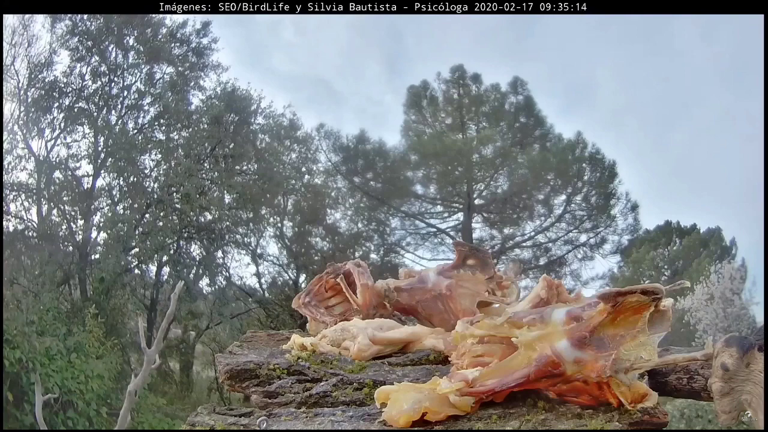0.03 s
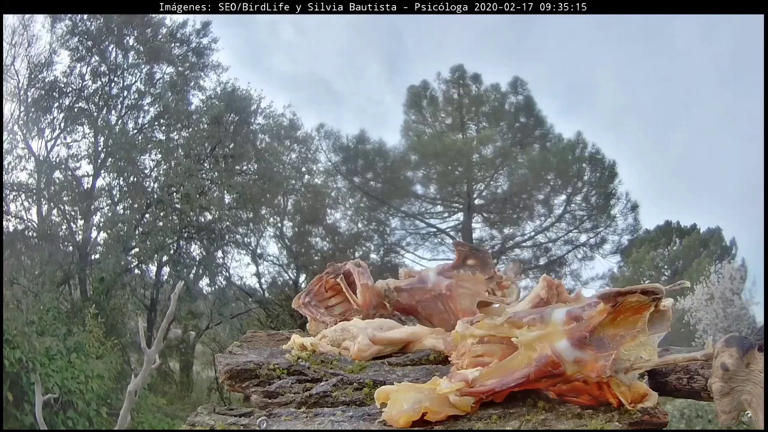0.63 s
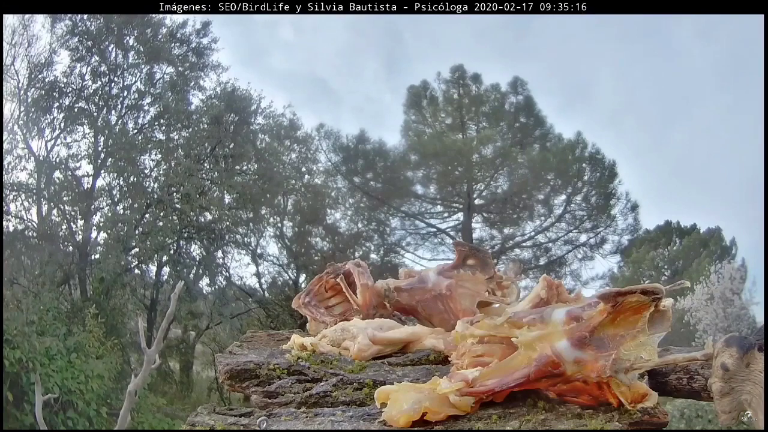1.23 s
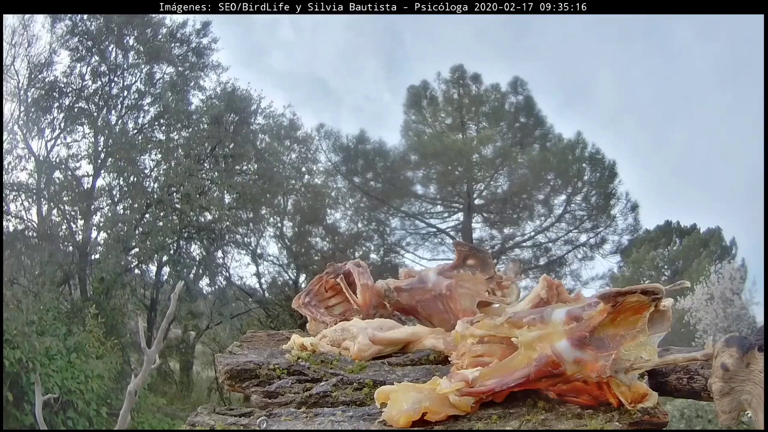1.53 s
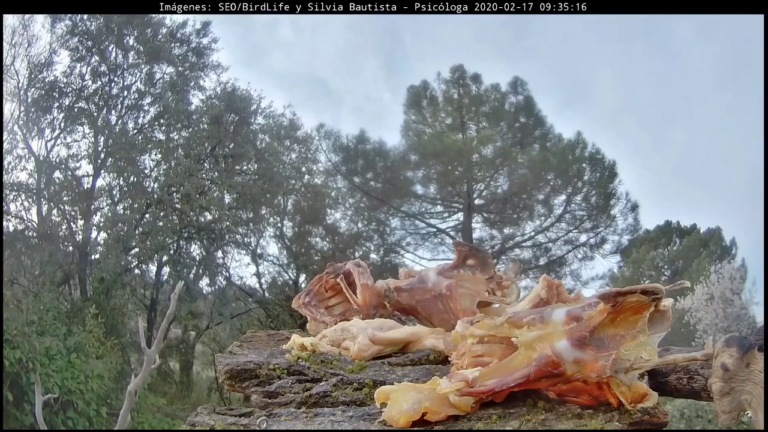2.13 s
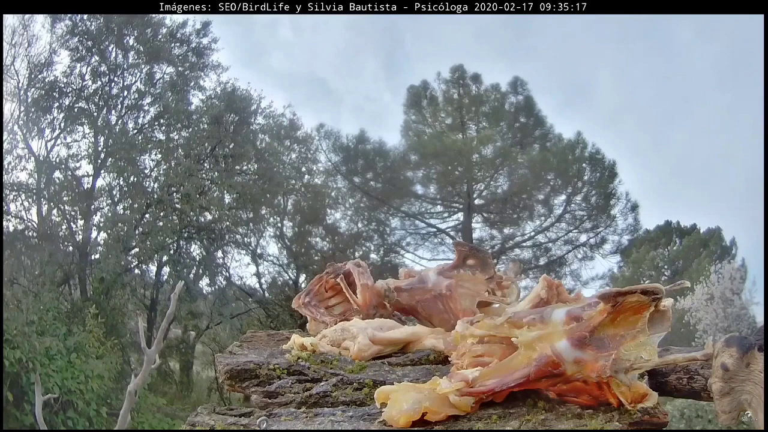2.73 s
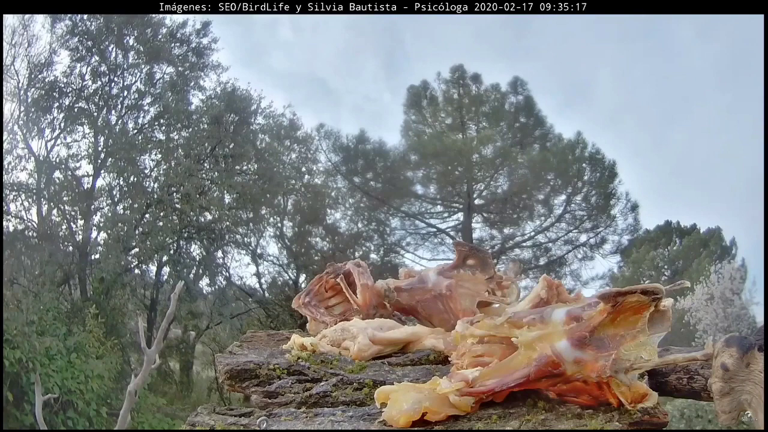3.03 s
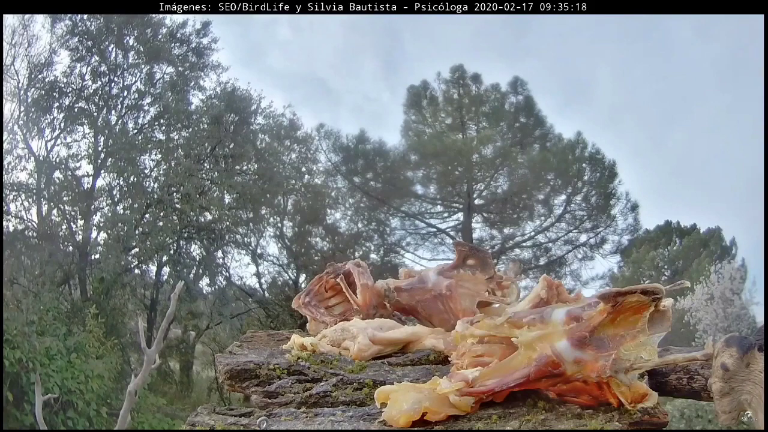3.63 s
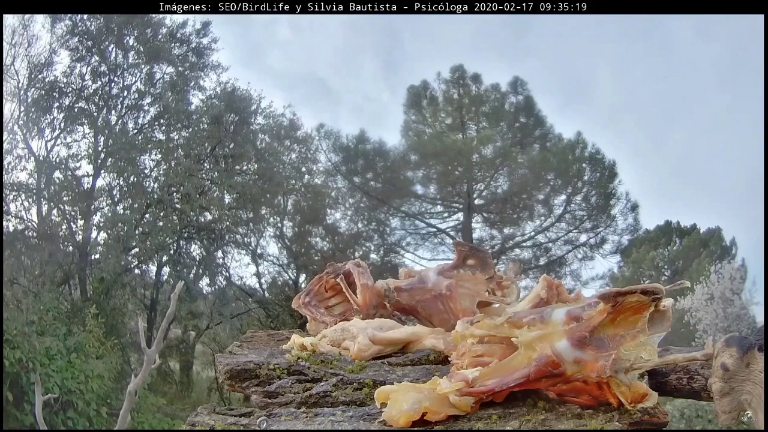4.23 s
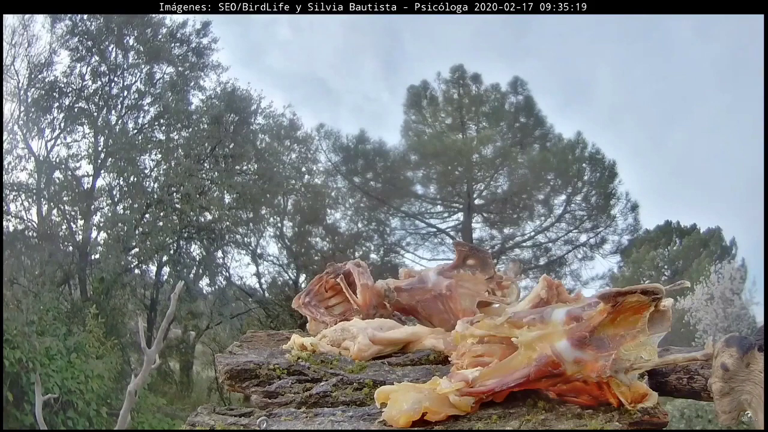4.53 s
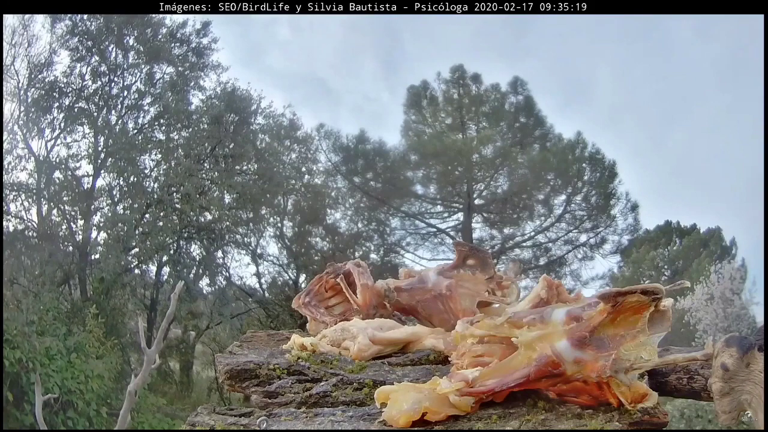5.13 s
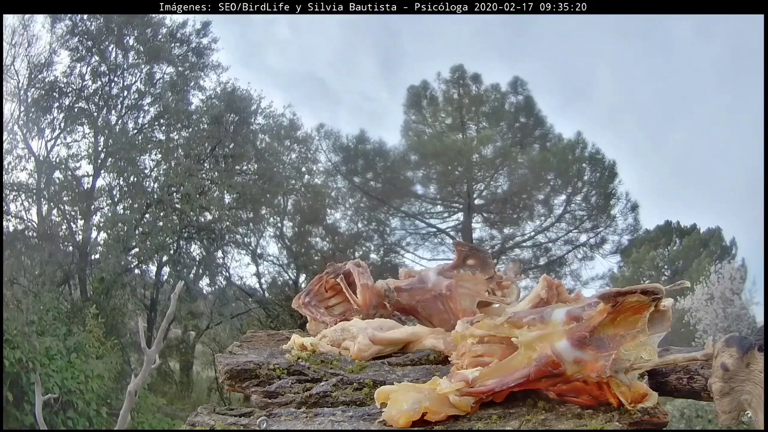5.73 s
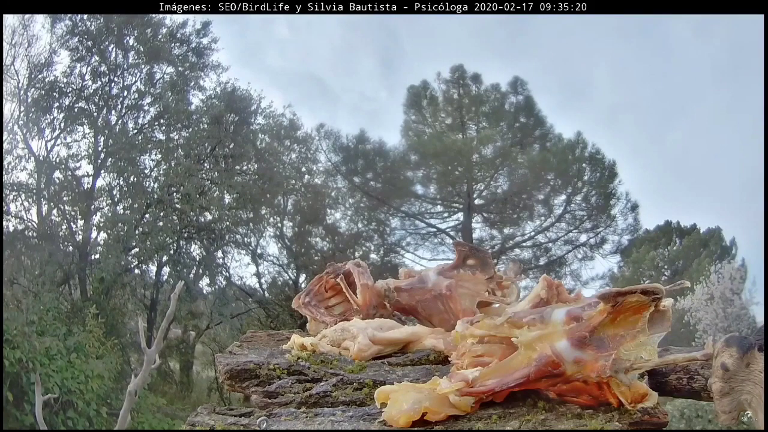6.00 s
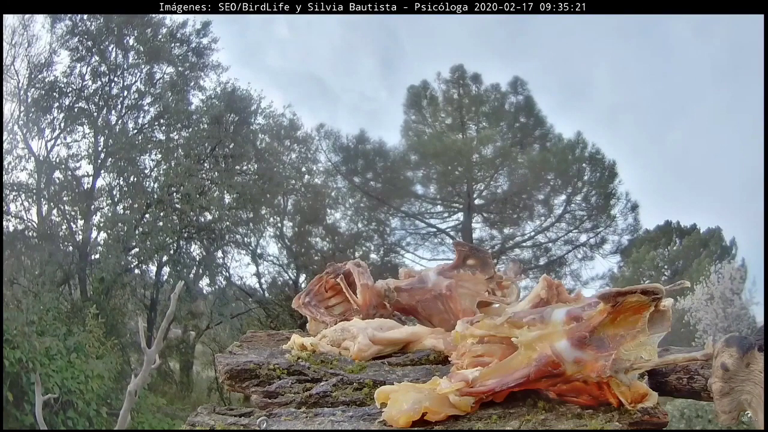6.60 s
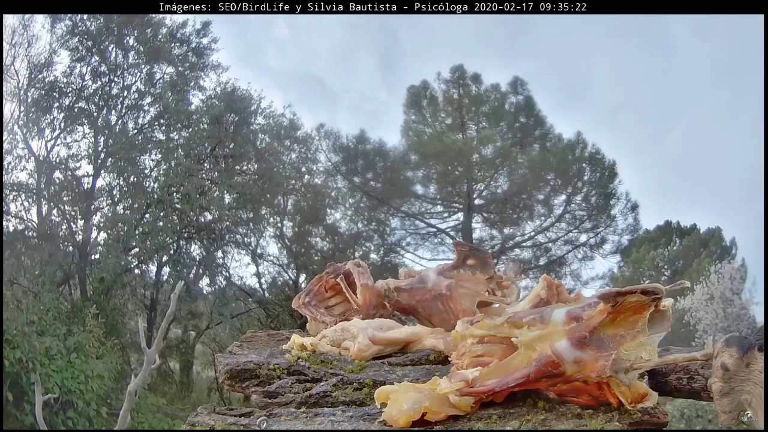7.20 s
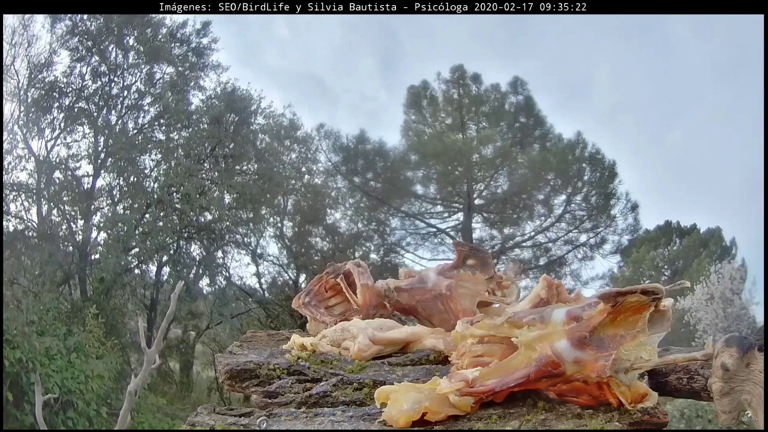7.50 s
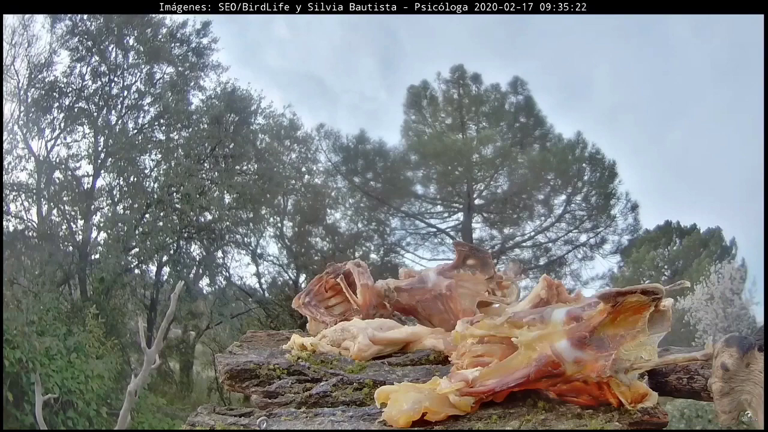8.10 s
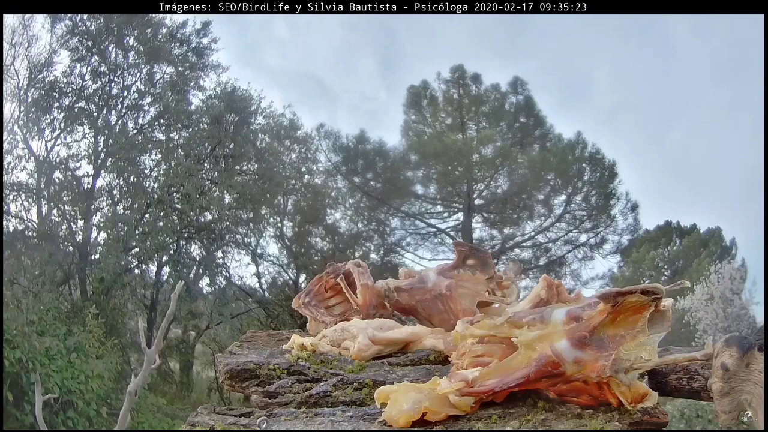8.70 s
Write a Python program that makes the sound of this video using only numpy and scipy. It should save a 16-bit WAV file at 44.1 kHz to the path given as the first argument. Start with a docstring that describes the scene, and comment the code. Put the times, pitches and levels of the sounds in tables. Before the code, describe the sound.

Low wind rumbles at the edge of a pine wood for nearly nine seconds. A steady, slightly hollow hiss lies under it, along with a thin, high, rapidly pulsing electronic buzz and tiny ticks that never stop. The wind swells from about 0.3 to 1 second, then eases into soft, uneven eddies. Small birds give faint, short, falling chirps here and there, with distant twittering around 1, 3.5 and 7 seconds and a very high peep about every two seconds. Two barely audible dry rustles pass near 1.5 and 3.5 seconds. At 7 seconds one clearer chirp stands out, and a distant woodpecker drums a single, slightly quickening roll until about 7.8 seconds, its taps trailing off among the trees. The wind builds beneath the roll to its strongest gust near 8 seconds and stays raised to the end.

```python
"""The edge of a pine wood, where a wildlife camera stands. Wind rumbles and swells twice over a steady
bed of hiss, coloured by the microphone housing. The camera's electronics add a thin, high buzz: one
burst and a few tiny ticks for every picture frame. Far off, dry rustles pass and small birds chirp in
sliding whistles. Near the end a distant woodpecker drums one roll: its beak rings a trunk, and the
trees scatter the taps into a long tail."""
import sys
import numpy as np
from scipy import signal
from scipy.fft import rfft, irfft
from scipy.io import wavfile
from scipy.ndimage import uniform_filter1d

SR = 44100
rng = np.random.default_rng(int(sys.argv[2]) if len(sys.argv) > 2 else 0)


def waveform_to_disk(signal):
    """Save audio, clipped to [-1, 1], as 16-bit WAV at the path in sys.argv[1]."""
    frames = np.transpose(np.atleast_2d(signal))
    scaled = np.clip(frames, -1, 1) * 32767
    samples = np.round(scaled).astype(np.int16)
    wavfile.write(sys.argv[1], SR, samples)


N = 385875
TIME = np.arange(N) / SR
FREQS = np.maximum(np.fft.rfftfreq(N, 1 / SR), 1)
FRAME_HZ, MIC_CUTOFF_HZ = 25, 7950

# EQ curves for the noise layers. Each row: frequency in Hz, relative level in dB.
HISS_EQ = [(600, -14), (1030, -9), (1250, -6.5), (1750, -5), (2200, -12.5), (2650, -9.5), (3050, -4.5),
           (3400, -4), (3800, -13.5), (5300, -12), (5750, -17), (6300, -8.5), (6950, 0.5), (7400, -0.5),
           (7900, -6.5)]
LOWER_GUST_EQ = [(40, -27.5), (70, -13.5), (105, -10.5), (140, 0.5), (178, -0.5), (215, -13), (300, -31),
                 (600, -70.5)]
UPPER_GUST_EQ = [(100, -31), (170, -14.5), (215, -1.5), (245, -2), (295, -2), (370, -14.5), (500, -26),
                 (800, -63)]
TREE_RUSH_EQ = [(120, -17), (220, -9), (310, -2), (380, 0), (440, 0.5), (510, -2), (590, -10.5), (660, -12),
                (780, -25), (900, -33), (1050, -55.5), (1500, -54.5)]
DEEP_RUMBLE_EQ = [(10, -14), (22, -7), (38, -1), (60, 1.5), (85, 0), (110, -3), (170, -14.5), (400, -49.5)]
RUSTLE_EQ = [(1300, -13), (1800, -2), (2400, 1), (3200, -5), (5000, -3), (6000, -22)]
FAINT_TOP_HISS_EQ = [(8500, -13), (10500, -2), (14000, 1), (15500, -4.5)]
# Resonances of the microphone housing. Each row: centre in Hz, width in Hz, boost in dB.
HOUSING_PEAKS = [(1170, 190, 7), (1538, 203, 9), (2362, 81, 9), (4683, 690, 16.5)]
# The wind's level ride. Each row: time in seconds, relative level in dB.
WIND_RIDE = [(0.0, -51), (.15, -51), (.32, -37.5), (.55, -41.5), (.68, -35), (.88, -38.5), (1.1, -52),
             (1.3, -43.5), (1.47, -49.5), (1.63, -43), (2.0, -45), (2.17, -40), (2.55, -43), (2.88, -50),
             (3.04, -42.5), (3.27, -55), (3.4, -48.5), (4.42, -46.5), (4.62, -50), (5.33, -43.5),
             (5.54, -47.5), (6.5, -46), (7.08, -45), (7.35, -40.5), (7.6, -37.5), (7.86, -30), (8.1, -33.5),
             (8.42, -37.5), (8.6, -37), (8.75, -37.5)]
# Tone of the gusts. Each row: time in seconds, tilt from the lower to the upper rumble in dB.
GUST_TILT = [(0, -3), (.7, -1.5), (1.6, 4), (2.3, 0.5), (3.1, 0), (4.4, -2), (5.4, 0), (6.2, 4.5),
             (7.0, 4.5), (7.8, 0), (8.6, -3.5)]
# Switching ticks. Each row: time into the frame in seconds, relative level in dB.
FRAME_TICKS = [(.0094, -65.5), (.0206, -78), (.0256, -70), (.0297, -67.8), (.0379, -74), (.0395, -69.5)]
# The ring of a tick. Each row: frequency in Hz, gain in dB, time constant in seconds.
TICK_MODES = [(2930, -8, 0.00038), (4633, 5.5, 0.00047), (7300, -11, 0.00045)]
# The buzz loops over five frames, the fourth one weak. Each entry: one burst's trim in dB.
BURST_TRIMS_DB = [-0.76, -0.34, -0.87, -2.2, -0.56]
# Dry rustles. Each row: start in seconds, length in seconds, level in dB.
RUSTLES = [(1.465, 0.065, -72.5), (3.454, 0.085, -69)]
# Contact calls, about two seconds apart. Each row: start in seconds, level in dB.
PEEPS = [(1.725, -74), (3.796, -70.3), (5.798, -70.5), (7.84, -70.3)]
# Clear chirps. Each row: start and length in seconds, first and last pitch in Hz,
# relative level in dB, rasp from 0 to 1.
CHIRPS = [(.19, .035, 3200, 2550, -67.5, .12), (.695, .04, 5950, 5500, -67, .25),
          (.728, .028, 5600, 4900, -63, .15), (2.074, .048, 3250, 2550, -67.5, .15),
          (3.463, .025, 5400, 5050, -63, .4), (4.074, .037, 3200, 2500, -62.5, .15),
          (5.295, .04, 3150, 2550, -70, .18), (6.908, .066, 5850, 5780, -59, .3),
          (7.045, .038, 5550, 4600, -49.2, .2), (7.874, .036, 3150, 3000, -63, .3),
          (8.0, .024, 3250, 2950, -58, .2)]
# Twitter from deeper in the wood. Each row: start in seconds, relative level in dB.
TWITTER = [(.858, -73), (.895, -72), (.965, -71), (1.015, -73), (1.11, -71), (3.361, -66.5), (3.415, -74),
           (3.545, -71), (3.59, -71.5), (3.647, -69), (3.703, -71), (3.78, -73), (3.853, -73), (7.116, -68),
           (7.152, -68.5), (7.205, -68.5), (7.25, -70), (7.305, -69), (7.38, -68), (7.425, -72),
           (7.52, -74), (7.785, -71), (7.88, -70), (7.975, -70)]
# Modes of the drummed trunk. Each row: frequency in Hz, relative level in dB, 60 dB decay in seconds.
TRUNK_MODES = [(1255, 0, 0.02), (1510, -11, 0.025), (1690, -9, 0.014), (2550, -19, 0.012)]
# The woodpecker's quickening roll. Each row: time in seconds, peak level in dB.
BEAK_TAPS = [(6.983, -59), (7.043, -55.5), (7.098, -54), (7.151, -52.5), (7.203, -54), (7.252, -51.5),
             (7.302, -53), (7.349, -53), (7.398, -52), (7.446, -52), (7.491, -51.5), (7.537, -50.5),
             (7.581, -52.5), (7.626, -54), (7.669, -53.5), (7.709, -55.5), (7.754, -57.5), (7.795, -55)]
# What the trees throw back of the taps. Each row: frequency in Hz, gain in dB.
SCATTER_EQ = [(1100, -11), (1340, -7), (1490, 6.5), (1750, 6.5), (2000, 5), (2600, 7), (3200, 1)]
# Stereo balance. Each row: frequency in Hz, left minus right in dB.
STEREO_BALANCE = [(280, 0), (400, -2.9), (500, -3.5), (800, .2), (1200, -4.6), (1750, -.4), (2700, 2.7),
                  (3900, 2.3), (5600, .7), (6600, 1.2), (7300, .3)]
# Stereo phase. Each row: frequency in Hz, lead of the left channel in radians.
STEREO_PHASE = [(160, 0), (340, -.32), (660, .15), (970, -.28), (1520, .36), (2600, 0)]


def from_db(db):
    """Decibels to gain."""
    return 10 ** (np.asarray(db) / 20)


def curve(points):
    """Join a table's points with straight lines on a log-frequency axis."""
    hz, values = np.transpose(points)
    return np.interp(np.log(FREQS), np.log(hz), values)


def equalise(sound, eq_db):
    """Shape a full-length track with an EQ curve."""
    return irfft(rfft(sound) * from_db(eq_db), N)


def noise(eq_db):
    """Coloured noise at an rms of 1."""
    coloured = equalise(rng.standard_normal(N), eq_db)
    return coloured / np.sqrt(np.mean(coloured ** 2) + 1e-20)


def drift(rate, size=N):
    """Smooth random modulation with a spread of about 1."""
    knots = rng.standard_normal(int(size / SR * rate) + 2)
    return np.interp(np.arange(size) / SR * rate, np.arange(len(knots)), knots)


def add(track, start_s, sound):
    """Drop a short sound onto a track."""
    start = int(start_s * SR)
    track[start:start + len(sound)] += sound[:N - start]


def forest_reverb(sound, t60, wet_db):
    """Trunks and crowns scatter a sound into a diffuse, dying tail; returns the wet signal only."""
    t = TIME[:SR]
    tail = rng.standard_normal(SR) * from_db(-60 * t / t60) * (1 - np.exp(-t / 0.044))
    return from_db(wet_db) * signal.fftconvolve(sound, tail / np.linalg.norm(tail))[:N]


def hiss(level_db=-69.5, split_hz=2100, rise_db_per_s=0.4951):
    """A bed of hiss with the housing's hollow resonances: the body creeps up, the top holds steady."""
    peaks_db = sum(db * np.exp2(-(2 * (FREQS - hz) / width) ** 2) for hz, width, db in HOUSING_PEAKS)
    rolloff_db = -60 * np.maximum(np.log2(FREQS / MIC_CUTOFF_HZ), 0)
    bed = noise(curve(HISS_EQ) + peaks_db + rolloff_db)
    body = irfft(rfft(bed) / (1 + (FREQS / split_hz) ** 10), N)
    top = bed - body
    return from_db(level_db) * (top + body * from_db(-0.3 + rise_db_per_s * TIME))


def moan(gust_db, centre_hz=216, width_hz=46, top_db=-34.5, growth=1.19):
    """The strongest gusts excite a hollow resonance, which swells faster than the gust itself."""
    resonance_db = -20 * np.log10(1 + (2 * (FREQS - centre_hz) / width_hz) ** 2)
    return from_db(top_db + growth * (gust_db - gust_db.max())) * noise(resonance_db)


def wind(eddy_db=2.02, eddies_per_s=8, lag_s=0.33, settle_s=0.41):
    """Gusts swell and eddy in the low mids; the rush in the crowns and the deep rumble trail gently."""
    ride_db = np.interp(TIME, *np.transpose(WIND_RIDE))
    tilt_db = np.interp(TIME, *np.transpose(GUST_TILT))
    mean_db = ride_db.mean()
    gust_db = ride_db - mean_db
    lower_db = mean_db - 4 - tilt_db / 2 + 0.99 * gust_db
    upper_db = mean_db - 3 + tilt_db / 2 + 0.98 * gust_db
    lower = from_db(lower_db + eddy_db * drift(eddies_per_s)) * noise(curve(LOWER_GUST_EQ))
    upper = from_db(upper_db + eddy_db * drift(eddies_per_s)) * noise(curve(UPPER_GUST_EQ))
    # The crowns answer a gust late and slowly.
    smoothed_db = uniform_filter1d(gust_db, int(settle_s * SR), mode="nearest")
    late_db = np.interp(TIME - lag_s, TIME, smoothed_db)
    rush = from_db(-49.5 + 0.3 * late_db) * noise(curve(TREE_RUSH_EQ))
    deep = from_db(-51.5 + 0.37 * late_db) * noise(curve(DEEP_RUMBLE_EQ))
    return lower + upper + rush + deep + moan(gust_db)


def camera_buzz(whine_hz=6600, whine_db=-50, on_s=.0278, off_s=.0383, idle_hz=6740, idle_db=-73):
    """A high whine gates on once a frame; a faint, slightly higher idle tone dies away after it."""
    in_frame = TIME % (1 / FRAME_HZ)
    gate = (in_frame > on_s) & (in_frame < off_s)
    edge = signal.windows.hann(100)
    envelope = np.convolve(gate, edge / edge.sum(), "same") * from_db(0.5 * drift(30))
    envelope *= from_db(np.take(BURST_TRIMS_DB, (TIME * FRAME_HZ).astype(int), mode="wrap"))
    phase_jitter = 0.68 * drift(40)
    burst = from_db(whine_db) * envelope * np.sin(2 * np.pi * whine_hz * TIME + phase_jitter)
    overshoot_hz, settle_s, fade_s = 420, .009, .0064   # the idle pitch settles from above
    cycles = idle_hz * in_frame - overshoot_hz * settle_s * np.exp(-in_frame / settle_s)
    idle = from_db(idle_db) * np.exp(-in_frame / fade_s) * np.sin(2 * np.pi * cycles)
    low_shelf_db = curve([(6250, -14), (6550, 0)])
    return equalise(burst + idle, low_shelf_db)


def camera_ticks(uneven_db=1.5, sizzle_from_s=.0105, sizzle_to_s=.0255, sizzle_per_s=2500):
    """The electronics tick at the same spots in every frame; a fine sizzle fades before each burst."""
    clicks = np.zeros(N)
    frame_starts = np.arange(0, TIME[-1] - 1 / FRAME_HZ, 1 / FRAME_HZ)
    for offset_s, db in FRAME_TICKS:
        times = frame_starts + offset_s + rng.uniform(0, .0003, len(frame_starts))
        clicks[(times * SR).astype(int)] = from_db(db + 0.5 + uneven_db * rng.standard_normal(len(times)))
    in_frame = TIME % (1 / FRAME_HZ)
    gate = (in_frame > sizzle_from_s) & (in_frame < sizzle_to_s)
    envelope = gate * from_db(-75.5 - 400 * (in_frame - sizzle_from_s))   # fades at 400 dB a second
    grains = (rng.random(N) < sizzle_per_s / SR) * rng.standard_normal(N)
    t = TIME[:SR // 100]
    ring = sum(from_db(db) * t / ring_s * np.exp(1 - t / ring_s) * np.sin(2 * np.pi * hz * t)
               for hz, db, ring_s in TICK_MODES)
    return signal.fftconvolve(clicks + envelope * grains, ring)[:N]


def rustles():
    """Short swells of dry noise, far off."""
    envelope = np.zeros(N)
    for start_s, length_s, db in RUSTLES:
        add(envelope, start_s, from_db(db) * np.sin(np.linspace(0, np.pi, int(length_s * SR))))
    return envelope * noise(curve(RUSTLE_EQ))


def peeps(length_s=.033, top_hz=7920, rise_hz=1050, rise_s=.009):
    """A tiny bird's very high contact call sweeps up fast and holds its top note."""
    track, t = np.zeros(N), TIME[:int(length_s * SR)]
    hz = top_hz - rise_hz * np.exp(-(t / rise_s) ** 2)
    call = np.sqrt(np.sin(np.pi * t / length_s)) * np.sin(2 * np.pi * np.cumsum(hz) / SR)
    for start_s, db in PEEPS:
        add(track, start_s, from_db(db) * call)
    return track


def whistle(hz, level_db, flutter_db=2):
    """One bird note: a sine rides a pitch curve under a fluttering swell."""
    swell = np.sin(np.linspace(0, np.pi, len(hz)))
    gain = from_db(level_db + flutter_db * drift(250, len(hz)))
    return swell * gain * np.sin(2 * np.pi * np.cumsum(hz) / SR)


def birds(rasp_hz=400, note_s=.04, note_hz=3050, spread_hz=90, fall_hz=380, shake_hz=230):
    """Thin, sliding chirps, and behind them wetter runs of short, hoarse, falling notes."""
    near, far = np.zeros(N), np.zeros(N)
    for start_s, length_s, first_hz, last_hz, db, rasp in CHIRPS:
        slide = np.linspace(first_hz, last_hz, int(length_s * SR))
        hz = slide + rasp * rasp_hz * drift(600, len(slide))
        add(near, start_s, whistle(hz, db - 4.5))
    fall = fall_hz * np.linspace(.5, -.5, int(note_s * SR))
    for start_s, db in TWITTER:
        hz = rng.normal(note_hz, spread_hz) + fall + shake_hz * drift(900, len(fall))
        add(far, start_s, whistle(hz, db - 1.3))
    near += forest_reverb(near, t60=.55, wet_db=-9)
    far += forest_reverb(far, t60=.7, wet_db=-1.5)
    return near + far


def woodpecker(attack_s=.005, echo_s=.03, echo_db=-17, predelay_s=.025):
    """Beak taps ring the trunk; the trees throw back a slap echo and a long, brighter tail."""
    taps, t = np.zeros(N), TIME[:SR // 10]
    for tap_s, peak_db in BEAK_TAPS:
        ring = np.zeros(len(t))
        for hz, db, t60 in TRUNK_MODES:
            decay = from_db(db + rng.normal(0, 2) - 60 * t / t60)
            detuned_hz = hz * rng.normal(1, .012)
            ring += decay * np.sin(2 * np.pi * (detuned_hz * t + rng.random()))
        knock = ring * (1 - np.exp(-(t / attack_s) ** 2))   # distance blunts the attack
        knock *= from_db(peak_db) / np.abs(knock).max()
        add(taps, tap_s - attack_s / 2, knock)
        add(taps, tap_s + echo_s, from_db(echo_db) * knock)
    send = equalise(taps, curve(SCATTER_EQ))
    add(taps, predelay_s, forest_reverb(send, t60=1.0, wet_db=0))
    return taps


def scene():
    """The mono mix, spread to stereo by level and phase offsets that vary with frequency."""
    mix = wind() + hiss() + camera_buzz() + camera_ticks() + woodpecker() + birds() + peeps() + rustles()
    left = from_db(curve(STEREO_BALANCE) / 2) * np.exp(1j * curve(STEREO_PHASE) / 2)
    return irfft(rfft(mix) * np.array([left, 1 / left]), N)


def record(dry, top_hiss_db=-98, top_hz=15300):
    """The microphone's narrow band cuts off the highs; only a very faint, airy hiss sits above."""
    mic_lowpass = signal.ellip(10, .2, 80, MIC_CUTOFF_HZ, fs=SR, output="sos")
    final_lowpass = signal.ellip(10, .2, 80, top_hz, fs=SR, output="sos")
    top_hiss = from_db(top_hiss_db) * noise(curve(FAINT_TOP_HISS_EQ))
    return signal.sosfilt(final_lowpass, signal.sosfilt(mic_lowpass, dry) + top_hiss)


dry = scene()
out = record(dry)
waveform_to_disk(out)
```